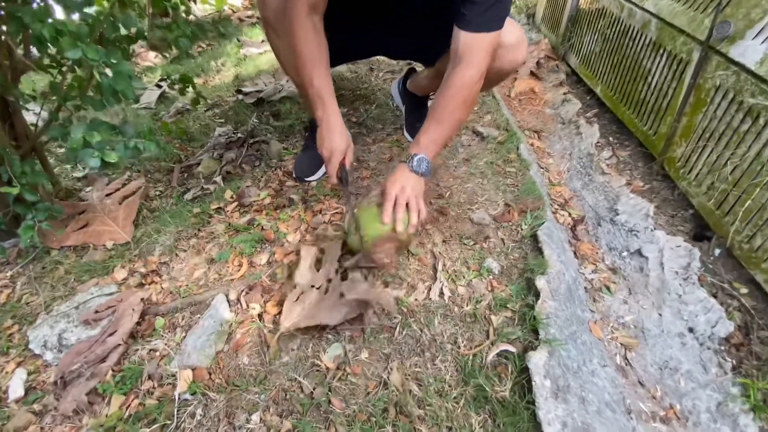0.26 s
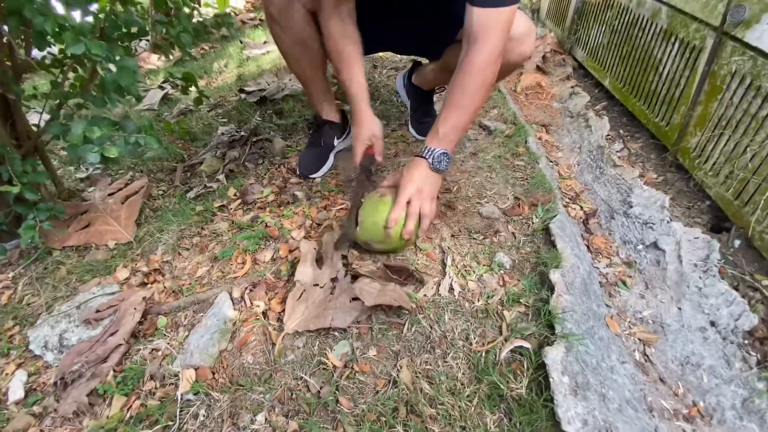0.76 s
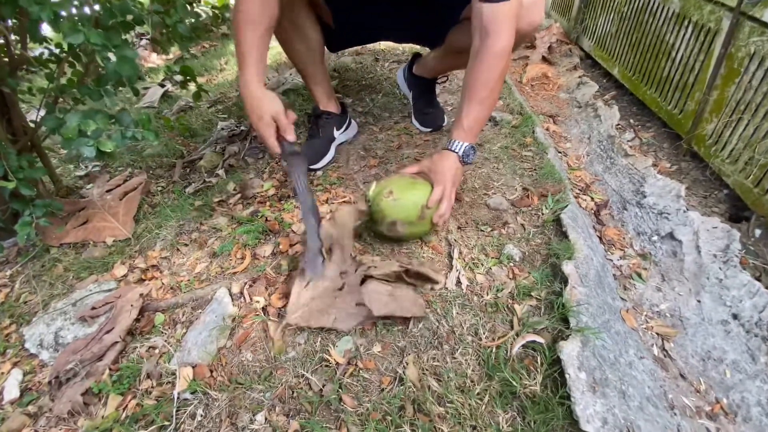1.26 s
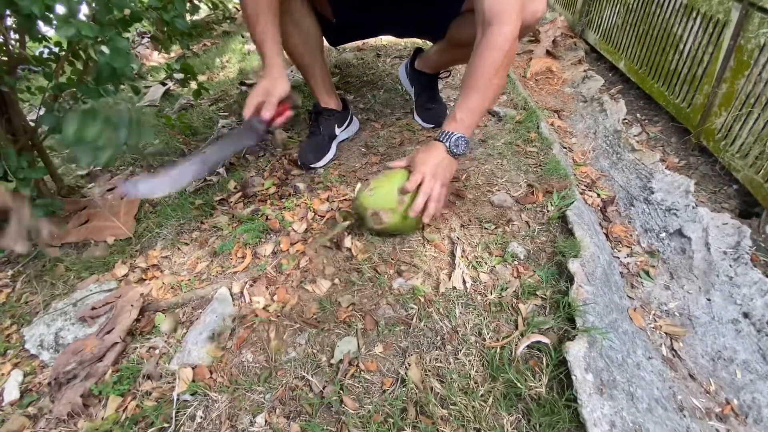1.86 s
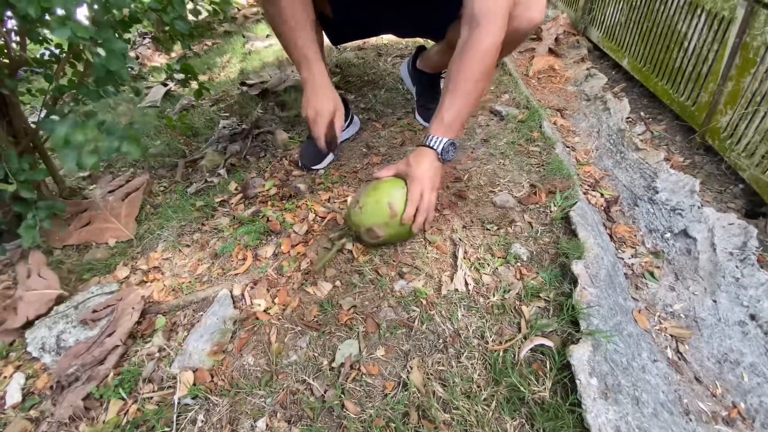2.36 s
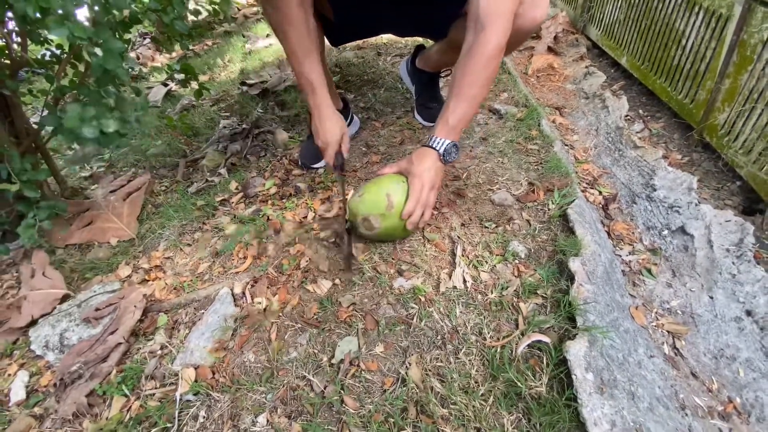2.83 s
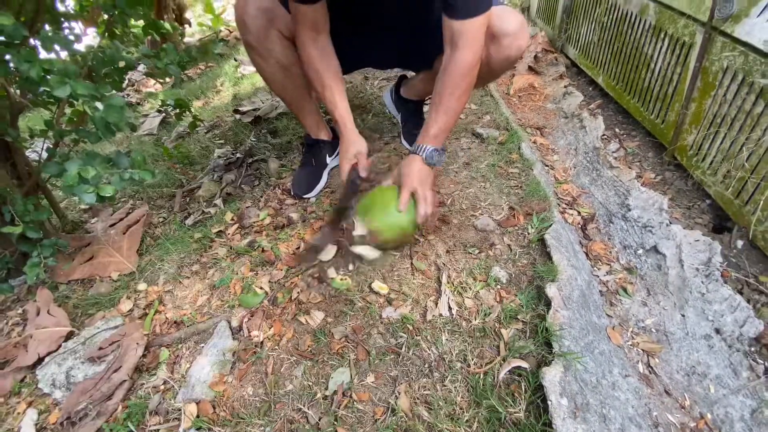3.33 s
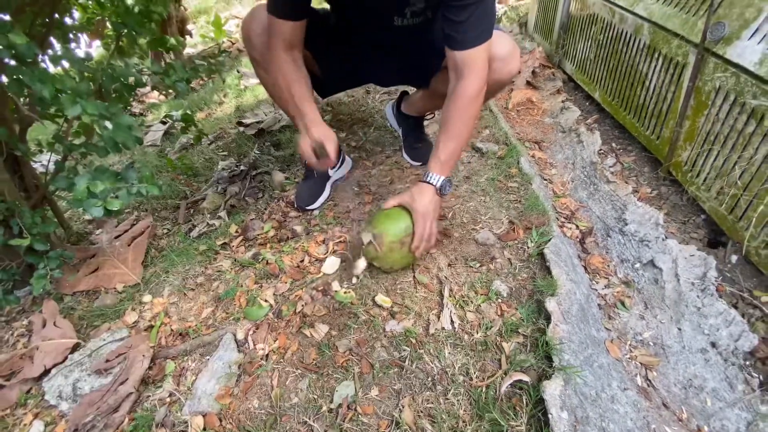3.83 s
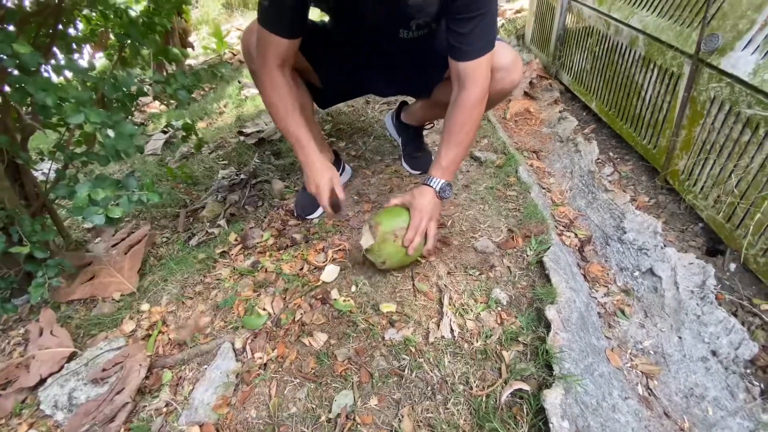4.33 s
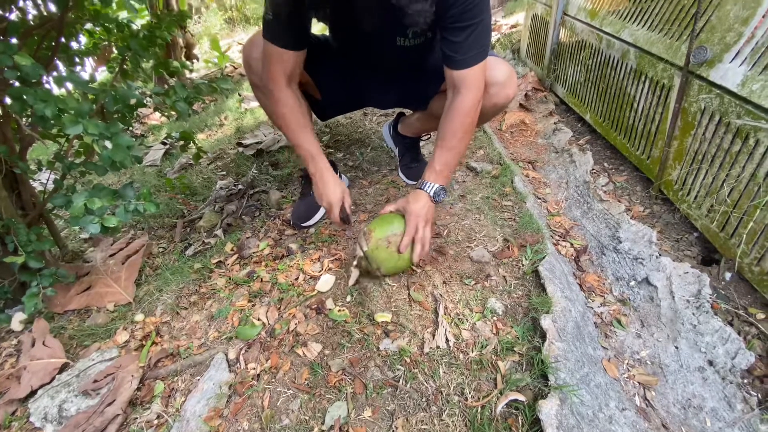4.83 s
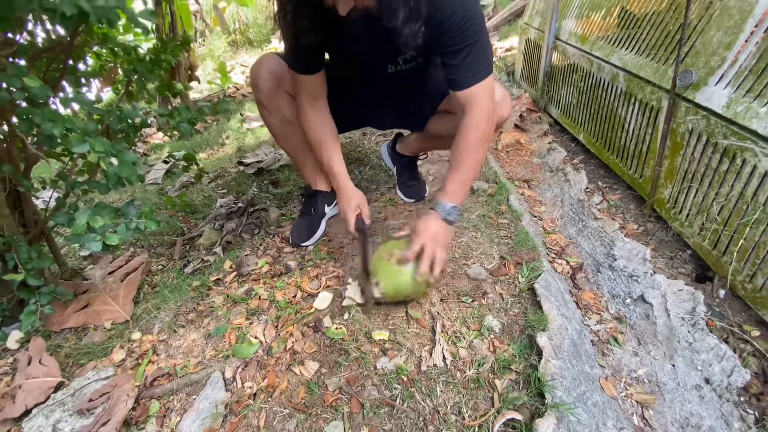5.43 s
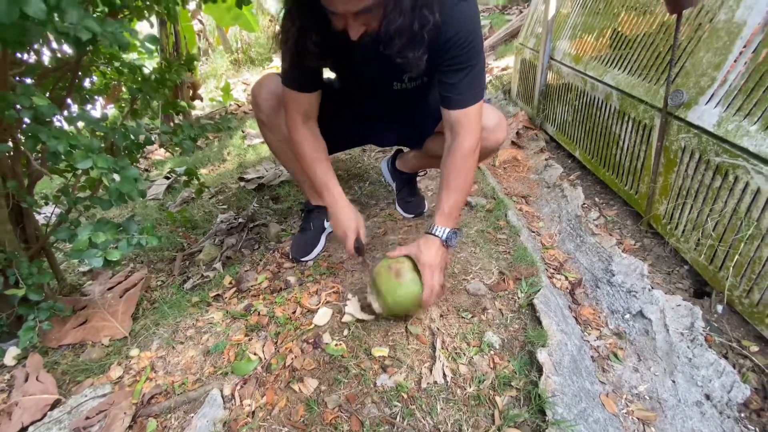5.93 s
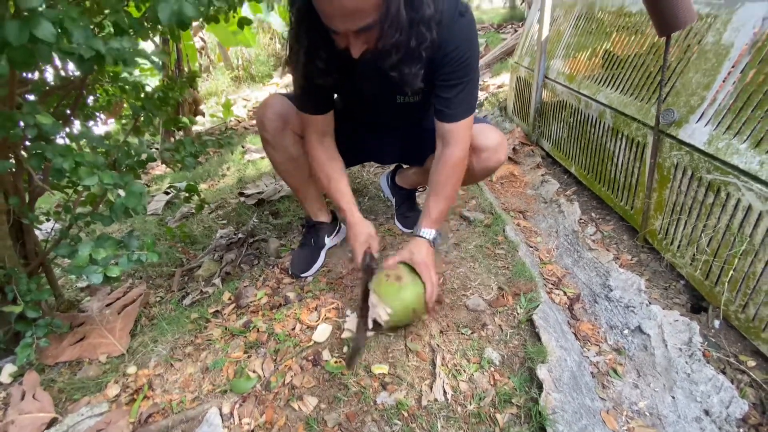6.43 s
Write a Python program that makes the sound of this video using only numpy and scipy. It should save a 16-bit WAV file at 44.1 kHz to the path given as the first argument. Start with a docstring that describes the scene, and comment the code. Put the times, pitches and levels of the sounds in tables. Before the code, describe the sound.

Sharp machete chops into coconut husk, spaced by a brief blade squeak and crisp rustling of dry leaves in a quiet garden.

```python
"""Machete on a green coconut

A machete chops a coconut on dry leaves: fibres tear, shell and steel ring, the nut thuds on the soil.
The blade sticks and slips with a squeak as it is worked out of the wet husk, sweeps a dry leaf aside
and scrapes the ground. Far traffic hums in the garden and a light wind bumps two microphone ports."""
import sys
import numpy as np
from scipy import signal
from scipy.fft import rfft, irfft, next_fast_len
from scipy.io import wavfile
from scipy.ndimage import uniform_filter1d

SR = 44100
rng = np.random.default_rng(int(sys.argv[2]) if len(sys.argv) > 2 else 0)


def file_out(sig):
    """Save sig as 16-bit WAV at sys.argv[1]."""
    # one column per channel
    cols = np.atleast_2d(sig).T
    # limit, then scale
    lim = np.clip(cols, -1, 1)
    pcm = np.round(lim * 32767).astype(np.int16)
    wavfile.write(sys.argv[1], SR, pcm)


N = 294588
SIDE = np.array([[.5], [-.5]])  # splits a left-over-right level between the ports


def gain_of(db):
    """Decibels to amplitude."""
    return 10 ** (np.asarray(db) / 20)


def unit_rms(x):
    """Scales to rms 1."""
    return x / np.sqrt(np.mean(x ** 2) + 1e-20)


def lookup(points, hz):
    """Interpolates a table on a log-frequency axis."""
    f, value = np.transpose(points)
    return np.interp(np.log(hz + 1), np.log(f + 1), value)


def add(mix, at_s, sound):
    """Mixes a sound in at a given time."""
    part = mix[..., max(round(at_s * SR), 0):][..., :sound.shape[-1]]
    part += sound[..., :part.shape[-1]]


def shaped(x, gain):
    """Filters by a gain that is a function of frequency."""
    size = next_fast_len(x.shape[-1])
    return irfft(rfft(x, size) * gain(np.fft.rfftfreq(size, 1 / SR)), size)[..., :x.shape[-1]]


def coloured(spectrum, size):
    """Two independent noises of rms 1; spectrum rows are f/Hz, density/dB."""
    return unit_rms(shaped(rng.standard_normal((2, size)), lambda hz: gain_of(lookup(spectrum, hz))))


def resonate(x, hz, width_hz):
    """Two-pole resonance of peak gain 1."""
    return signal.lfilter(*signal.iirpeak(hz, hz / width_hz, SR), x)


def ring_modes(x, modes):
    """Parallel modes, each two equal resonant stages in series."""
    return sum(gain_of(db) * resonate(resonate(x, hz, width), hz, width) for hz, width, db in modes)


def flutter(rate_hz):
    """Smooth random curve of rms 1."""
    return unit_rms(shaped(rng.standard_normal(N), lambda hz: np.exp(-(hz / rate_hz) ** 2)))


def jitter(size, span):
    """Noise averaged over span samples, rms 1."""
    return unit_rms(uniform_filter1d(rng.standard_normal(size), span))


def swells(rows):
    """Power sum of envelopes: peak t/s, level/dB, rise/s, fall/s (per 20 dB, signs ignored)."""
    t, power = np.arange(N) / SR, np.zeros(N)
    for at_s, db, rise_s, fall_s in rows:
        rise_s, fall_s = abs(rise_s), abs(fall_s)
        near = slice(max(round((at_s - 3 * rise_s) * SR), 0), round((at_s + 3 * fall_s) * SR))
        drop_db = 20 * np.maximum((at_s - t[near]) / rise_s, (t[near] - at_s) / fall_s)
        power[near] += gain_of(db - drop_db) ** 2
    return np.sqrt(power)


# background spectra: f/Hz, density/dB
FOLIAGE_SPECTRUM = [(88, -35), (150, -1), (508, -9.5), (1440, -7.5), (3630, -20), (6680, -18), (7970, -29),
                    (10700, -31), (12300, -32), (13800, -38), (15000, -55), (16500, -81)]
TRAFFIC_SPECTRUM = [(13, -60), (22, 3.5), (34, -7.5), (64, 8), (96, -3), (124, -2.5), (146, -17),
                    (225, -38), (260, -25), (340, -57), (570, -120)]
# background levels: t/s, rumble/dB, hiss/dB
GARDEN_LEVELS = [(0.0, -48, -54.5), (0.65, -42.5, -57), (1.11, -46, -56.5), (1.92, -46, -55),
                 (2.51, -45, -57.5), (2.9, -43, -53.5), (3.05, -48, -54), (4.71, -45, -56),
                 (5.14, -50.5, -55), (5.39, -42.5, -54.5), (5.67, -54.5, -55.5), (6.3, -51.5, -55),
                 (6.68, -48.5, -58.5)]


def garden():
    """Far foliage hisses over a lumpy traffic rumble."""
    times_s, rumble_db, hiss_db = np.transpose(GARDEN_LEVELS)
    t = np.arange(N) / SR
    hiss = gain_of(np.interp(t, times_s, hiss_db) + 0.9 * flutter(29)) * coloured(FOLIAGE_SPECTRUM, N)
    rumble = gain_of(np.interp(t, times_s, rumble_db)) * coloured(TRAFFIC_SPECTRUM, N)
    return hiss + rumble


# modes of husk and shell, and of the gripped blade: f/Hz, stage width/Hz, level/dB
NUT_MODES = [(690, 870, -1), (1044, 630, 0), (1410, 570, 1.5), (2203, 310, 2.5)]
GRIPPED_BLADE_MODES = [(3755, 860, 22.5), (4870, 2700, 22), (6630, 850, 20), (8750, 550, 2),
                       (10350, 3500, 16.5), (13500, 1300, 13)]
# leaf and husk litter, crisp rustle and dull scrape: f/Hz, density/dB
CRISP_SPECTRUM = [(1410, -28), (2400, -7.5), (3680, -6.5), (5830, -7), (8180, -10), (10500, -10.5),
                  (12000, -9), (13800, -10.5), (15500, -17), (16500, -50)]
DULL_SPECTRUM = [(88, -34), (150, -11.5), (701, -0.5), (795, -5), (1060, 0), (1620, -3.5), (1890, 4.5),
                 (3000, -16), (4500, -13), (6600, -63)]
# blows: t/s, husk/dB, shell/Hz, shell/dB, steel/dB, steel tilt/(dB/octave), bite/s, debris/dB,
# thud/dB, thud/Hz, thud delay/s, ground shudder/dB
BLOWS = [(.006, -12, 2000, -14.5, -16, 0.5, 0.0055, -28, -17, 187, 0.0043, -30),
         (2.655, -17, 1375, -9.5, -18, 1.5, .012, -23.5, -20.5, 256, 0.0082, -30.5),
         (3.988, -17, 677, -13.5, -15.5, -1, 0.0042, -28.5, -4.5, 168.5, 0.00524, -23),
         (4.561, -17.5, 2206, -12, -18, 6, 0.0079, -30.5, -14.5, 187, 0.0062, -23.5),
         (5.926, -15.5, 580, -11, -14.5, -1, 0.0049, -27.5, -2, 152, 0.0044, -24)]


def chop(husk_db, shell_hz, shell_db, steel_db, tilt_db_oct, bite_s, debris_db,
         thud_db, thud_hz, delay_s, shudder_db):
    """Fibres tear as the edge bites; nut and blade ring, the nut thuds on the soil and throws debris."""
    def unit_over_bite(x):
        return x / np.sqrt(np.sum(x ** 2) / (2 * bite_s * SR))

    t = np.arange(SR // 4) / SR
    biting = np.clip(t / 0.0015, 0, 1) * np.exp(-np.maximum(t - bite_s, 0) / 0.003)
    tearing, grinding = rng.standard_normal((2, 2, len(t))) * biting
    husk = 0.43 * resonate(tearing, 900, 2500) + ring_modes(tearing, NUT_MODES)
    husk = gain_of(husk_db) * unit_over_bite(husk)
    pressure = np.sin(np.pi * np.clip(t / (1.39 * bite_s), 0, 1)) ** 1.7
    shell = gain_of(shell_db) * pressure * np.sin(2 * np.pi * (shell_hz * t + rng.random((2, 1))))

    grinding = grinding * np.exp(-t / 0.054)  # the edge slows in the fibre
    modes = [(hz, width, db + tilt_db_oct * np.log2(hz / 7000)) for hz, width, db in GRIPPED_BLADE_MODES]
    steel = gain_of(steel_db) * unit_over_bite(0.039 * grinding + ring_modes(grinding, modes))

    thud_t60_s, shudder_hz, shudder_t60_s = 0.036, 61.4, 0.14
    late_s = np.maximum(t - delay_s, 0)
    cycles = thud_hz * (late_s + 0.0013 * (1 - np.exp(-late_s / 0.0026)))  # pitch falls as soil gives
    attack = 1 - np.exp(-late_s / 0.00081)
    thud = -np.sin(2 * np.pi * cycles) * gain_of(thud_db - 60 * late_s / thud_t60_s) * attack
    shudder = np.sin(2 * np.pi * shudder_hz * late_s) * gain_of(shudder_db - 60 * late_s / shudder_t60_s)

    patter = unit_rms(gain_of(jitter(len(t), span=150)))
    litter = coloured(DULL_SPECTRUM, len(t)) + 1.82 * coloured(CRISP_SPECTRUM, len(t))
    debris = gain_of(debris_db) * litter * patter * np.clip(t / bite_s, 0, 1) * np.exp(-t / 0.019)
    return husk + steel + shell + thud + shudder + debris


def grit(low_hz, high_hz, per_s, q):
    """Sparse clicks of very unequal size, each ringing in one of ten bands."""
    out = np.zeros((2, N))
    for hz in np.geomspace(low_hz, high_hz, 10):
        hits = rng.random(N) < per_s / 10 / SR
        clicks = hits * gain_of(4 * np.minimum(rng.exponential(1, N), 3.5))
        out += resonate(clicks * rng.choice([-1, 1], (2, N)), hz, hz / q) / np.sqrt(hz)
    return unit_rms(out)


# strokes through the litter: peak t/s, crisp/dB, dull re crisp/dB, rise/s, fall/s
LEAF_STROKES = [(.05, -49, -14, .01, 0.18), (.18, -49.5, -4.5, .012, 0.45), (.255, -47.5, -3, .15, 0.14),
                (0.357, -47, -7, 0.065, 0.07), (0.475, -50, -6.5, .04, 0.1), (.6, -50.5, 2, 0.039, 0.25),
                (0.699, -54, 18, 0.16, 0.12), (0.858, -47, 3, 0.012, 0.1), (1.068, -52.5, 0, 0.35, -6.3),
                (1.169, -31, 3.5, 0.0046, 0.0136), (1.196, -29, -5, 0.018, 0.08),
                (1.258, -32, -3, .2, .025), (1.312, -36, -3, .015, .2), (1.38, -33, -2.5, .15, .035),
                (1.41, -51, -6, .04, 0.3), (1.49, -37, -6, .03, 0.11), (1.565, -28, -3, .12, .12),
                (1.6, -35, -4, .1, .025), (1.661, -30.5, -1, 0.015, 0.07), (1.715, -36.5, -11, .15, -0.06),
                (1.767, -39.5, -6.5, 0.025, 0.14), (1.901, -38, -11.5, 0.087, 0.1),
                (1.985, -39.5, -4, 0.07, .07), (2.03, -50, -10, .05, 0.65), (2.192, -47, -6, 0.19, 0.2),
                (2.7, -46.5, -17, .04, 0), (2.748, -43, -9, 0.024, -0.07), (2.82, -53, -16, 0.41, 0.3),
                (2.928, -32.5, -7.5, 0.034, 0.02), (3.066, -47.5, -23, 0.36, -0.1),
                (3.114, -44.5, -3, 0.0029, -0.08), (3.136, -55.5, 8, 0.027, 0.12), (3.4, -68, 12, .6, 0.2),
                (3.447, -50, 5.5, 0.0078, .033), (4.028, -40, 6, 0.065, 0.12),
                (4.294, -27.5, -1.5, 0.019, 0.0462), (4.34, -44.5, 8, .011, 0.05),
                (4.4, -49, -1.5, 0.081, 0.2), (4.555, -37, -9, 0.023, -0.09), (4.62, -59, 2.5, 0.061, 0.3),
                (4.746, -63.5, 1, 0.13, 0.7), (4.88, -56, 6, 0.013, 0.09), (4.89, -36, -13, 0.017, 0.12),
                (4.936, -37.5, 7.5, 0.068, 0.0273), (5.0, -57, 3.5, 0.12, -0.23), (5.24, -65, 8, .2, 0.5),
                (6.04, -59.5, 1.5, .2, 1.1), (6.12, -53, -1, 0.16, -0.7), (6.208, -45, -22, .12, -0.36),
                (6.25, -41, -16, .008, 0.09), (6.298, -34, 3, 0.11, 0.03), (6.39, -54, -5, .015, .12)]


def rustle():
    """Blade, nut and feet push through dry leaves: grainy noise with crackle and grit."""
    grains = unit_rms(gain_of(3 * flutter(500) + 2.5 * flutter(40)))
    crisp = unit_rms(coloured(CRISP_SPECTRUM, N) * grains + .4 * grit(3300, 11000, per_s=500, q=5))
    dull = unit_rms(coloured(DULL_SPECTRUM, N) * grains ** .7 + .8 * grit(950, 2500, per_s=500, q=8))
    at_s, crisp_db, dull_db, rise_s, fall_s = np.transpose(LEAF_STROKES)
    crisp *= swells(zip(at_s, crisp_db, rise_s, fall_s))
    dull *= swells(zip(at_s, crisp_db + dull_db, rise_s, fall_s))
    return crisp + dull


# snaps and taps: t/s, peak/dB, f/Hz, crack re ring/dB, t60/s
SNAPS_AND_TAPS = [(0.12, -37, 1960, -4, 0.031), (0.178, -36.5, 1350, 0, 0.07),
                  (0.349, -32, 1260, -2, 0.025), (1.074, -29, 1710, -7, 0.042),
                  (1.172, -13.5, 5830, -5.5, 0.043), (1.192, -5, 5470, -14, 0.024),
                  (1.238, -16, 5570, -24, 0.093), (1.318, -23, 1950, 1.5, 0.12),
                  (1.379, -20.5, 5800, 7, 0.04), (1.442, -9, 4800, 4.5, 0.016),
                  (1.722, -28, 9000, 7, 0.013), (1.498, -11, 5700, -15, 0.013),
                  (1.544, -5, 5970, -5, 0.0092), (1.659, -16.5, 1990, -1.5, 0.1),
                  (1.765, -24.5, 3900, -2, 0.061), (1.782, -27, 6440, -5, 0.025),
                  (1.965, -13, 1930, -2.5, 0.025), (1.978, -20.5, 4000, 4, 0.024),
                  (2.305, -31, 1000, -9, 0.03), (2.306, -33, 1900, -9, 0.025),
                  (2.742, -27.5, 6700, -2, 0.022), (2.859, -29, 1010, -4, 0.028),
                  (2.881, -29.5, 1450, -16, 0.036), (2.914, -21, 2480, 3, 0.032),
                  (3.134, -26, 1030, -15, 0.05), (3.135, -32, 1950, -15, 0.04),
                  (3.167, -30.5, 686, -8, 0.042), (3.385, -32, 1020, -12, 0.035),
                  (3.425, -32.5, 2260, -20, 0.04), (3.445, -33, 5400, -2.5, 0.036),
                  (3.561, -33.5, 1240, -14, 0.054), (4.016, -18, 1010, -9, 0.039),
                  (4.036, -18, 1320, -11, 0.032), (4.065, -27.5, 800, -8, 0.04),
                  (4.279, -11, 3650, -9, 0.03), (4.279, -17, 2100, -15, 0.034),
                  (4.292, -2.5, 3700, -8, 0.035), (4.339, -20, 3700, -15, 0.068),
                  (4.876, -23, 940, -18, 0.028), (4.91, -24, 1460, 1, 0.05),
                  (4.93, -12.5, 1420, -2.5, 0.023), (4.932, -13.5, 2360, -13, 0.028),
                  (5.103, -31.5, 1980, -28, 0.052), (5.217, -36, 1380, -29, 0.14),
                  (6.104, -27.5, 2200, -10, 0.045), (6.205, -30.5, 4370, 6.5, 0.036),
                  (6.253, -24.5, 6940, 8.5, 0.055), (6.283, -17, 1540, -7, 0.076)]


def snap(peak_db, note_hz, crack_db, t60_s):
    """A sharp noise burst: part rings at the note of the struck piece, part stays broad."""
    crest_db = 9
    t = np.arange(SR // 10) / SR
    ring = unit_rms(resonate(rng.standard_normal((2, len(t))), note_hz, 0.14 * note_hz))
    crack = gain_of(crack_db) * coloured(CRISP_SPECTRUM, len(t))
    front = (1 + 0.24 * np.exp(-t / 0.0002)) * np.clip(t / 0.00092, 0, 1)
    return gain_of(peak_db - crest_db - 60 * t / t60_s) * (ring + crack) * front


# modes of the split husk: f/Hz, stage width/Hz, level/dB
CUT_MODES = [(576, 410, -12.5), (1048, 206, 2.5), (1544, 206, 0), (1918, 67, 2), (2340, 113, -1)]
# pulls on the stuck blade: t/s, length/s, rise/s, level/dB, level change/dB,
# first slip rate/Hz, last slip rate/Hz, ragged share/0-1
BLADE_PULLS = [(.571, 0.046, 0.014, -19.5, -15, 520.6, 483.4, 0.64),
               (.645, 0.057, 0.0092, -27, -1, 362.4, 332, 0.4),
               (.721, .011, 0.0017, -14.5, -7, 356, 352, 0.45),
               (.732, .033, .003, -18, 0.5, 384.5, 357.3, 0.15),
               (.765, 0.016, 0.0025, -16.5, -1, 660, 632, 0.15), (.782, .03, .002, -18, 3, 553, 515, .12),
               (.818, .013, 0.0034, -10, -9.5, 512, 508, 0.31),
               (.835, 0.012, 0.0033, -15.5, -10.5, 508, 511, 0.52),
               (.847, .012, 0.0016, -26.5, -14, 508, 505, .75)]


def squeak(length_s, rise_s, level_db, change_db, first_hz, last_hz, ragged):
    """Steel sticks and slips on wet fibre: a partly ragged pulse train rings the split husk."""
    t = np.arange(0, length_s + 0.011, 1 / SR)
    progress = np.clip(t / length_s, 0, 1)
    slip_hz = first_hz + (last_hz - first_hz) * progress
    wander, grip = jitter(len(t), span=110), jitter(len(t), span=110)
    cycles = np.cumsum(slip_hz * (1 + .2 * ragged * wander)) / SR
    pulses = sum(np.cos(2 * np.pi * k * cycles) for k in range(1, 9)) * gain_of(6 * ragged * grip)
    drive = (1 - ragged) * unit_rms(pulses) + ragged * rng.standard_normal(len(t))
    wet_fibre = signal.butter(8, 2240, fs=SR, output="sos")  # soaks up the treble
    ring = signal.sosfilt(wet_fibre, ring_modes(drive, CUT_MODES))
    ring = unit_rms(np.roll(ring, -round(.003 * SR)))  # skips the modes' build-up
    second_path = signal.hilbert(ring).imag  # a quarter cycle late
    hiss_spectrum = [(300, -12.5), (2000, -3.5), (2750, -3.5), (3400, 4), (6000, -9.5),
                     (11000, -11.5), (14000, -11), (16000, -38)]
    hiss = gain_of(-17.5) * coloured(hiss_spectrum, len(t))
    envelope = np.clip(t / rise_s, 0, 1) * np.exp(-np.maximum(t - length_s, 0) / .0015)
    return (np.array([ring, second_path]) + hiss) * gain_of(level_db + change_db * progress) * envelope


# gusts: peak t/s, level/dB, rise/s, fall/s
WIND_GUSTS = [(4.958, -42, 0.17, 0.7), (5.18, -31, 0.078, 0.38), (5.532, -32.5, .45, 0.3)]
# puffs: t/s, level/dB, pitch scale/Hz, left over right/dB, t60/s
WIND_PUFFS = [(3.001, -38, 178, 11, 0.11), (5.144, -33, 418, 6, 0.053), (5.229, -32.5, 147, 14, 0.085),
              (5.4, -39, 220, 12, 0.035), (5.569, -32.5, 202, 1, 0.13)]


def wind():
    """Gusts push one port and suck at the other; single puffs bump them and sink in pitch."""
    lumps = coloured([(20, -16), (45, -1), (80, -4.5), (140, -14), (400, -36.5), (900, -58)], N)
    lumps[1] = .8 * lumps[1] - .6 * lumps[0]
    out = swells(WIND_GUSTS) * lumps * unit_rms(gain_of(2.5 * flutter(15)))
    t = np.arange(SR // 10) / SR
    for at_s, db, pitch_hz, pan_db, t60_s in WIND_PUFFS:
        cycles = pitch_hz * 0.0305 * (1 - np.exp(-t / 0.0284))
        puff = np.sin(2 * np.pi * (cycles + rng.random((2, 1))))
        envelope = gain_of(db + pan_db * SIDE - 60 * t / t60_s) * np.clip(t / 0.0013, 0, 1)
        add(out, at_s, puff * envelope)
    return out


# modes of the free blade: f/Hz, level/dB, t60/s
FREE_BLADE_MODES = [(6450, 0, .25), (7470, 0, 0.39), (8694, -3.5, 0.32), (9900, -1.5, .2)]
# blade rings: t/s, level/dB, tilt/(dB/mode)
BLADE_PINGS = [(3.136, -50, -5), (3.447, -67, 5), (4.938, -49.5, 2), (6.4, -77, 6)]


def ping(level_db, tilt_db):
    """The freed blade rings faintly in its high modes."""
    t = np.arange(SR // 3) / SR
    ring = sum(gain_of(k * tilt_db + db - 60 * t / t60_s) * np.sin(2 * np.pi * hz * t + 6 * rng.random())
               for k, (hz, db, t60_s) in enumerate(FREE_BLADE_MODES))
    beating = 1 + 0.53 * np.sin(2 * np.pi * 19 * t)  # as of close mode pairs
    return gain_of(level_db) * ring * np.clip(t / 0.0049, 0, 1) * beating


def ports(pair, coherence, phase_lead):
    """The right port hears a phase-turned share of the left sound plus a share by another path."""
    def share(hz):
        return lookup(coherence, hz)

    lead_hz, lead_rad = np.transpose(phase_lead)
    direct = shaped(pair[0], lambda hz: share(hz) * np.exp(-1j * np.interp(hz, lead_hz, lead_rad)))
    indirect = shaped(pair[1], lambda hz: np.sqrt(1 - share(hz) ** 2))
    return np.array([pair[0], direct + indirect])


# likeness of the two ports: f/Hz, coherence/ratio
NUT_COHERENCE = [(200, 1), (600, 0.77), (2200, 0.99), (4000, 0.66), (7800, 0.63), (9000, 1)]
LEAF_COHERENCE = [(200, 1), (600, 0.53), (2000, 0.52), (4000, 0.45), (7800, 0.48), (9000, 1)]
GARDEN_COHERENCE = [(40, -.1), (80, -.05), (130, .6), (290, .55), (640, .01), (7800, .01), (9000, 1)]
# lead of the left port, set by housing and source angle: f/Hz, phase/rad
NUT_PHASE = [(0, 0), (2500, 1.0), (2930, 2.5), (3620, 1.1), (5430, 4.9), (6800, 1.0), (8010, 4.1),
             (8610, 0.0), (9390, 1.2), (12600, -3.9), (13200, -5.8), (14600, -6.5), (15700, -9.6),
             (16500, -8.6)]
LEAF_PHASE = [(0, 0), (1720, 2.4), (2070, 1.8), (3360, 2.4), (4050, 4.7), (5430, 6.3), (7840, 4.4),
              (8790, -0.3), (9390, 0.9), (12600, -3.8), (13300, -5.9), (14600, -6.4), (15200, -9.4),
              (16500, -9.3)]


def scene():
    """Nut and leaves lie at different angles to the ports; the background is largely diffuse."""
    nut, leaves = np.zeros((2, N)), rustle()
    for at_s, *row in BLOWS:
        add(nut, at_s - .001, chop(*row))
    for at_s, *row in BLADE_PULLS:
        add(nut, at_s, squeak(*row))
    for at_s, *row in BLADE_PINGS:
        add(nut, at_s, ping(*row))
    for at_s, *row in SNAPS_AND_TAPS:
        add(leaves, at_s - .0005, snap(*row))
    near = ports(nut, NUT_COHERENCE, NUT_PHASE) + ports(leaves, LEAF_COHERENCE, LEAF_PHASE)
    return near + ports(garden(), GARDEN_COHERENCE, LEAF_PHASE) + wind()


# port imbalance: f/Hz, left over right/dB
PORT_BALANCE = [(60, 4), (95, -2.5), (150, 2), (240, -0.5), (380, 0), (600, 3), (950, 4.5), (1500, 1.5),
                (2380, 3.5), (3770, 0.0), (5980, 10.5), (9470, 0), (15000, 0.0)]


def record(dry):
    """Unequal ports with a bass roll-off, one brief dip in level, soft saturation, then a band limit."""
    bass_hz, top_hz, ceiling = 35, 16800, .95
    dip_at_s, dip_width_s, dip_db = 3.102, 0.012, -14
    t = np.arange(N) / SR
    heard = shaped(dry, lambda hz: gain_of(SIDE * lookup(PORT_BALANCE, hz))
                   * hz ** 2 / (hz ** 2 + bass_hz ** 2))
    heard *= gain_of(dip_db * np.exp(-((t - dip_at_s) / dip_width_s) ** 2))
    heard = ceiling * heard / (ceiling ** 6 + heard ** 6) ** (1 / 6)
    lowpass = signal.firwin(1023, top_hz, window=("kaiser", 11), fs=SR)
    return signal.oaconvolve(heard, lowpass[None], "same")


dry = scene()
out = record(dry)
file_out(out)
```